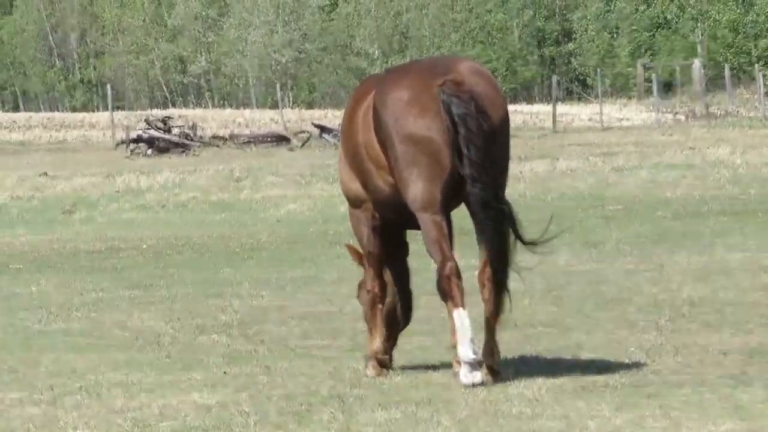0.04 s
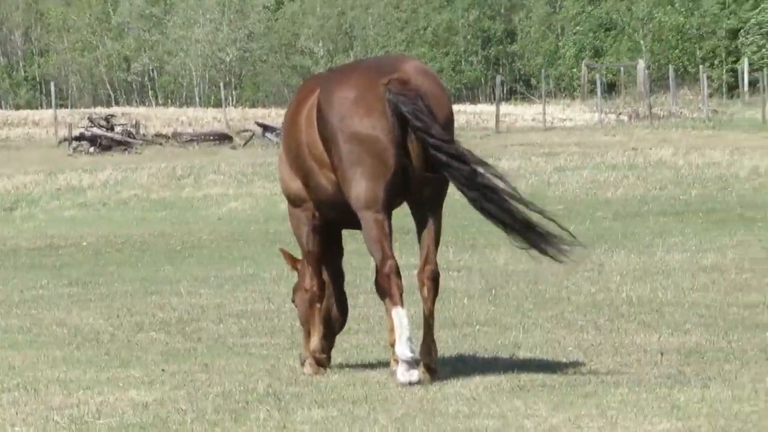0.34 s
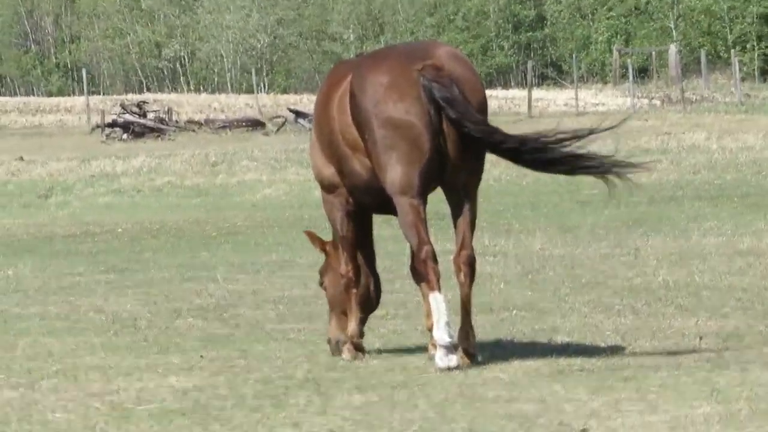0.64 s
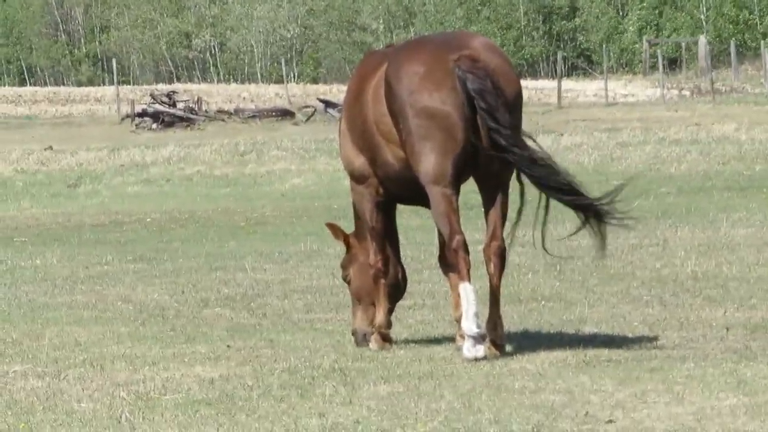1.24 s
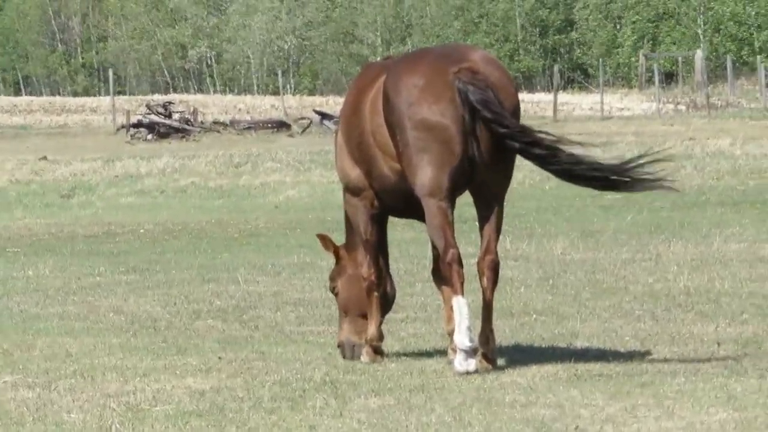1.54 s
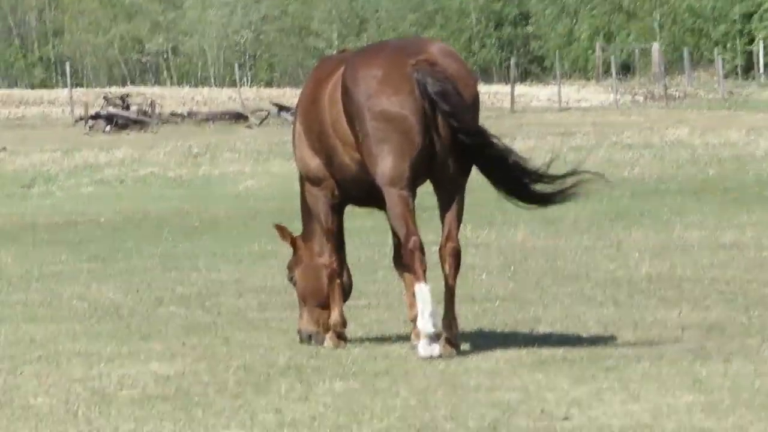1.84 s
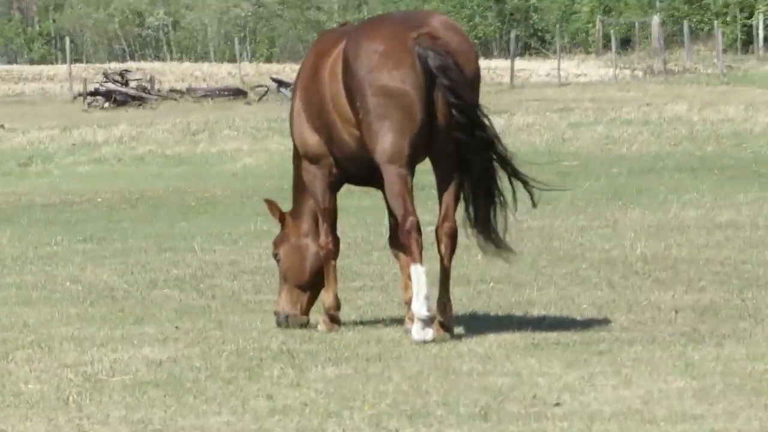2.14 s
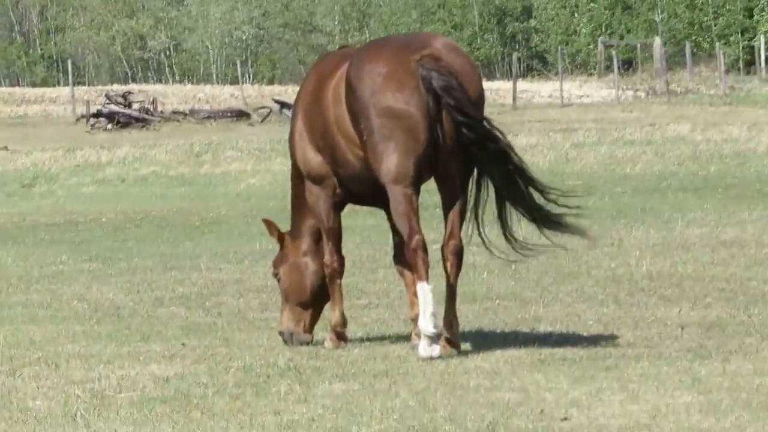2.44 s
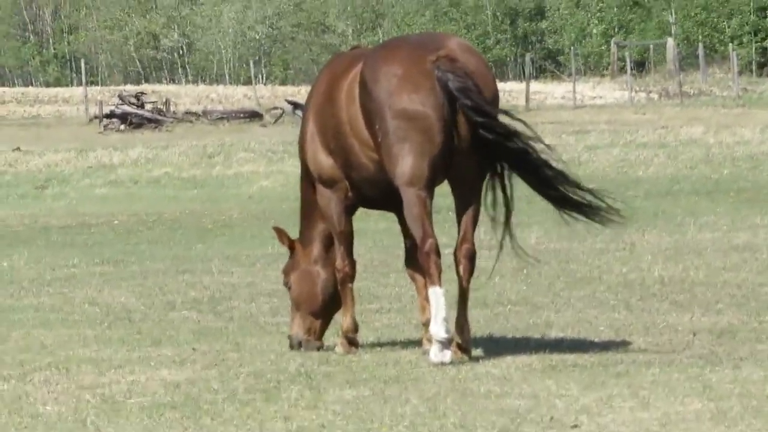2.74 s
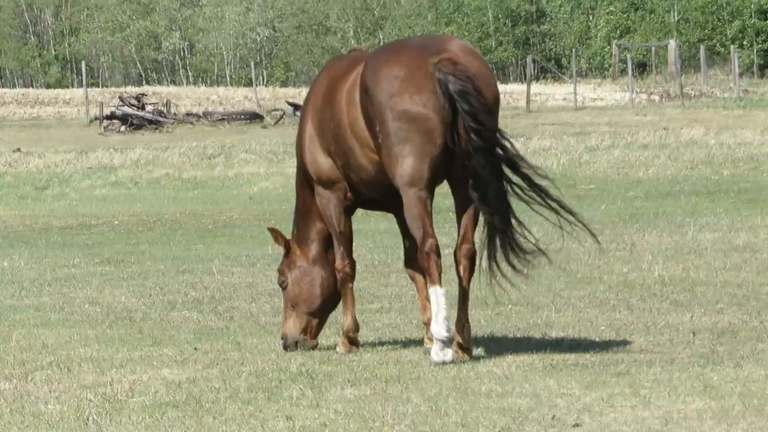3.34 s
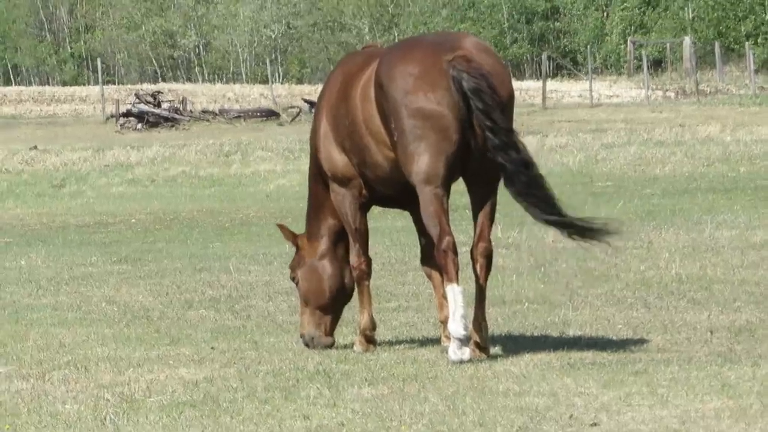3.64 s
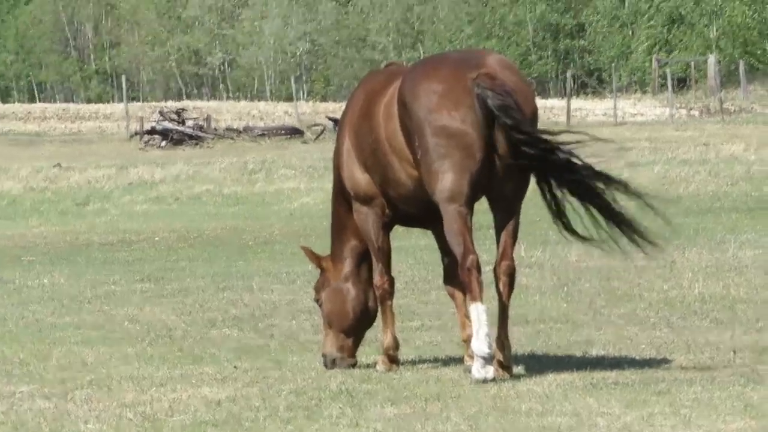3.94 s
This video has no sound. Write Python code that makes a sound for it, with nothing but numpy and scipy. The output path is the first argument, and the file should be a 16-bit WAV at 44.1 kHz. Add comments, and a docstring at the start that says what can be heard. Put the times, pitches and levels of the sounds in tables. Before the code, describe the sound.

Gusty wind hits the microphone in an open field, making a rough, fluttering rumble. It sputters at first, swells, drops briefly around the middle, then slaps back and blows hardest near the end, over a faint hiss.

```python
"""Open field: gusty wind buffets the two ports of a camera microphone, over a faint hiss.
Eddies are carried past the ports: the faster the air, the louder and brighter the rumble.
The flow flutters, drops into short lulls and slaps back.
The microphone thins the bass; gain control holds the gusts down and a soft ceiling rounds the peaks."""
import sys
import numpy as np
from scipy import signal
from scipy.fft import rfft, irfft
from scipy.io import wavfile
from scipy.ndimage import uniform_filter1d, map_coordinates

SR = 44100
rng = np.random.default_rng(int(sys.argv[2]) if len(sys.argv) > 2 else 0)


def log_audio(samples):
    """Write samples as a 16-bit WAV file to the path given in sys.argv[1]."""
    # one column per channel
    frames = np.atleast_2d(samples).T
    # limit to full scale, then quantise
    limited = np.clip(frames, -1, 1)
    pcm = np.round(limited * 32767).astype(np.int16)
    wavfile.write(sys.argv[1], SR, pcm)


N = 176400


def amp(db):
    """Decibels to gain."""
    return 10 ** (np.asarray(db) / 20)


def unit(x):
    """Scale to rms 1."""
    return x / np.sqrt(np.mean(x ** 2) + 1e-20)


def curve_at(points, hz):
    """Interpolate (freq_hz, value) points on a log-frequency axis."""
    freq_hz, value = np.transpose(points)
    return np.interp(np.log(hz + 1), np.log(freq_hz + 1), value)


def colour(x, points):
    """Filter by (freq_hz, gain_db) points."""
    return irfft(rfft(x) * amp(curve_at(points, np.fft.rfftfreq(N, 1 / SR))), N)


def field_hiss(level_db=-66.5):
    """Faint steady hiss of the field behind the wind."""
    # hiss spectrum: freq_hz, density_db
    spectrum = [(200, -1), (1500, 1), (4000, -9), (7000, -12.5), (11000, -24), (13500, -40), (16000, -47)]
    return amp(level_db) * unit(colour(rng.standard_normal((2, N)), spectrum))


def buffets(t):
    """Single sharp buffets: Gaussian pulses of extra wind strength, in dB."""
    # pulses: centre_s, sigma_s, peak_db
    pulses = [(0.103, 0.00207, 10.5), (.145, 0.00103, 10), (0.208, 0.00197, 8), (.24, 0.0013, 10),
              (0.274, .0016, 17.5), (.344, 0.00083, 16.5), (0.363, 0.0028, 4.5), (.448, 0.00294, 6),
              (0.593, 0.0031, 6), (0.772, 0.00287, 5), (0.823, 0.00112, 9.5), (1.048, 0.00193, 6),
              (1.092, 0.0022, 9.5), (1.515, 0.00098, 10), (1.85, 0.0026, 7.5), (1.884, 0.00072, 12),
              (1.948, 0.00134, 13), (2.004, 0.0026, 6.5), (2.063, .0015, 16.5), (2.469, 0.0026, 9.5),
              (2.558, .002, 8), (3.253, 0.00085, 12), (3.583, .002, 7)]
    return sum(peak_db * np.exp(-.5 * ((t - centre_s) / sigma_s) ** 2)
               for centre_s, sigma_s, peak_db in pulses)


def air_speed(strength_db, unrest):
    """Air speed relative to the steady wind; unrest scales its random flutter and small slaps."""
    # flutter spectrum: rate_hz, density_db
    flutter_spectrum = [(3, -14), (12, -5.5), (30, -1), (100, -2), (400, -8.5), (1500, -43.5), (5000, -53)]
    slaps_per_s, slap_decay_s, db_per_doubling = 110, .0007, 28
    flutter = 1.42 * unit(colour(rng.standard_normal(N), flutter_spectrum))
    kicks = rng.uniform(0, 2, N) * (rng.random(N) < slaps_per_s / SR)
    slaps = 3.5 * signal.lfilter([1], [1, -np.exp(-1 / (slap_decay_s * SR))], kicks)
    flow_db = uniform_filter1d(strength_db + unrest * (flutter + slaps), size=9)
    return 2 ** np.clip(flow_db / db_per_doubling, -10, 2)


def eddy_pattern(oversample):
    """Pressure along the air stream; both ports share the large eddies, less so the small."""
    # eddy pressure in the steady wind: freq_hz, density_db
    spectrum = [(30, -1), (300, 3), (600, 3), (1200, 0.5), (2000, -3.5), (3000, -9.5), (4500, -20.5),
                (7000, -35), (10000, -50), (14000, -65), (22000, -76)]
    # likeness of the ports: freq_hz, coherence (clipped to 0-1)
    likeness = [(320, 1.48), (600, 0.84), (1000, 0.88), (1700, .66), (2800, 0.4), (10000, 0.24)]
    # lag of the right port: freq_hz, phase_rad
    lag = [(700, 0.027), (1400, -0.14), (2600, 0.77), (4500, 2.58), (10000, 3.9)]
    # left over right: freq_hz, level_db
    balance = [(800, 0), (2000, 0), (4500, 2.5), (9000, 4)]
    size, shared_below_hz = N * oversample, 380
    hz = np.fft.rfftfreq(size, 1 / (SR * oversample))
    shared, own = rfft(rng.standard_normal((2, size)))
    smallness = hz ** 2 / (hz ** 2 + shared_below_hz ** 2)  # fades in the three port tables
    coherence = 1 - smallness * (1 - np.clip(curve_at(likeness, hz), 0, 1))
    lean = amp(smallness * curve_at(balance, hz) / 2)
    left = shared * lean * np.exp(1j * smallness * curve_at(lag, hz))
    right = (coherence * shared + np.sqrt(1 - coherence ** 2) * own) / lean
    return unit(irfft(np.array([left, right]) * amp(curve_at(spectrum, hz)), size))


def eddy_lumps(pressure, unrest, push_db):
    """Middle-sized eddies come in lumps of uneven force and push harder in a buffet."""
    # unevenness spectrum: rate_hz, density_db
    lump_spectrum = [(4, -25), (20, 5.5), (80, 0), (250, -5.5), (700, -34), (2000, -73)]
    # weight of the eddies affected: freq_hz, gain_db
    band = [(150, -11), (400, -4.5), (900, -0.5), (2500, 3.5), (6000, -0.5)]
    unevenness = unit(colour(rng.standard_normal(N), lump_spectrum))
    lumps_db = 2.0 * unrest * np.clip(unevenness, -3, 1.8)
    return pressure + colour(pressure, band) * (amp(lumps_db + push_db) - 1)


def wind():
    """Eddies sweep past the ports; air speed sets their pitch and force."""
    # wind strength at the ports: time_s, level_db
    gusts = [(0.0, -25.0), (0.02, -37), (0.03, -20.0), (0.09, -47.5), (0.11, -29.5), (0.13, -36.5),
             (0.17, -24.5), (0.19, -39), (0.2, -14), (0.23, -40.5), (0.26, -36.5), (0.27, -20.5),
             (0.28, -33.5), (0.3, -23), (0.33, -34), (0.37, -21.5), (0.43, -30.0), (0.44, -18.5),
             (0.49, -21.5), (0.56, -13.5), (0.69, -28.0), (0.71, -20.5), (0.76, -24.5), (0.77, -19),
             (0.96, -25.0), (1.03, -47), (1.11, -32.5), (1.12, -18), (1.17, -35.5), (1.18, -21.0),
             (1.39, -15.5), (1.51, -27.5), (1.52, -20), (1.57, -14.5), (1.61, -24), (1.62, -15.0),
             (1.67, -32.0), (1.68, -20.5), (1.79, -30.5), (1.84, -49.5), (1.86, -31.5), (1.87, -56.5),
             (1.94, -48.5), (1.97, -30.1), (2.02, -20.5), (2.05, -49.5), (2.07, -53), (2.09, -21.5),
             (2.2, -20), (2.21, -11), (2.22, -25.5), (2.3, -19.5), (2.34, -30.5), (2.38, -30),
             (2.43, -46.5), (2.52, -36), (2.53, -21), (2.65, -28.0), (2.66, -17.0), (2.67, -30.5),
             (2.75, -19.0), (2.83, -28), (2.91, -23.0), (2.92, -34.5), (2.97, -24), (3.05, -39),
             (3.06, -51.5), (3.09, -18.5), (3.1, -37), (3.14, -25.5), (3.18, -35), (3.21, -20), (3.25, -34),
             (3.28, -15), (3.43, -19.5), (3.52, -13), (3.57, -19.0), (3.61, -15), (3.83, -17.5),
             (3.85, -13), (3.89, -27), (3.91, -13), (3.95, -22), (4.0, -17)]
    steady_db, gain_db = -20, -14.5
    suction, pressure_exponent, oversample = 0.089, 2.29, 2
    t = np.arange(N) / SR
    strength_db = np.interp(t, *np.transpose(gusts)) - steady_db
    buffet_db = buffets(t)
    unrest = 1 + .06 * np.clip(-strength_db, -4, 9)  # weak wind sputters more
    speed = air_speed(strength_db + .6 * buffet_db, unrest)
    travelled = np.cumsum(speed) * oversample
    pressure = np.array([map_coordinates(port, [travelled], order=3, mode="grid-wrap")
                         for port in eddy_pattern(oversample)])
    pressure = pressure - suction * (pressure ** 2 - 1)  # eddy cores pull harder than they push
    pressure = eddy_lumps(pressure, unrest, push_db=0.25 * buffet_db)
    return amp(gain_db) * pressure * speed ** pressure_exponent


def gain_control(x):
    """Turn the strongest gusts down by a share of their excess level, then recover slowly."""
    threshold_db, share, average_s, fall_db_per_s = -18.5, 0.39, 0.047, 58
    pole = np.exp(-1 / (average_s * SR))
    power = signal.lfilter([1 - pole], [1, -pole], (x ** 2).mean(0))
    power_db = 10 * np.log10(power + 1e-12)
    fall_db = np.arange(N) / SR * fall_db_per_s
    held_db = np.maximum.accumulate(power_db + fall_db) - fall_db
    return x * amp(-share * np.maximum(held_db - threshold_db, 0))


def scene():
    """Wind on the ports over the hiss of the field."""
    return wind() + field_hiss()


def record(dry):
    """Microphone response, gain control, soft ceiling, band limit."""
    # microphone with its wind filter: freq_hz, gain_db
    response = [(10, -61), (28, -48), (45, -28), (72, -18.5), (130, -12), (200, -8), (320, -2), (600, 0),
                (3000, 0.5), (6000, 5.84), (10500, 11.5), (13500, 2), (16000, -24)]
    ceiling, knee, cutoff_hz = .92, 4, 15800
    levelled = gain_control(colour(dry, response))
    rounded = levelled / (1 + abs(levelled / ceiling) ** knee) ** (1 / knee)
    lowpass = signal.firwin(511, cutoff_hz, window=("kaiser", 9), fs=SR)
    return signal.oaconvolve(rounded, lowpass[None], "same")


dry = scene()
out = record(dry)
log_audio(out)
```